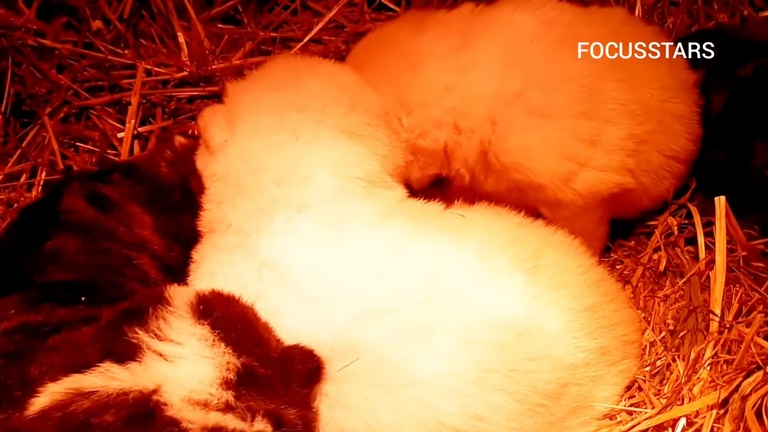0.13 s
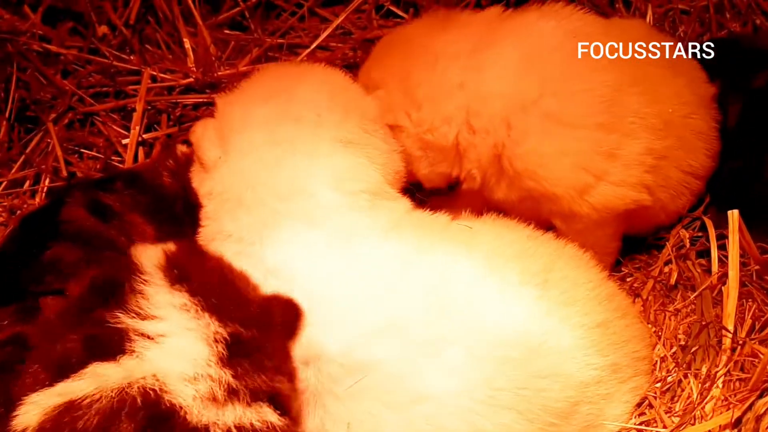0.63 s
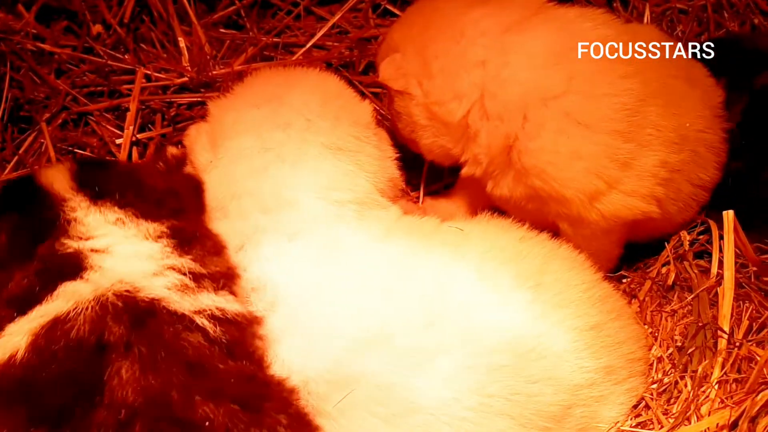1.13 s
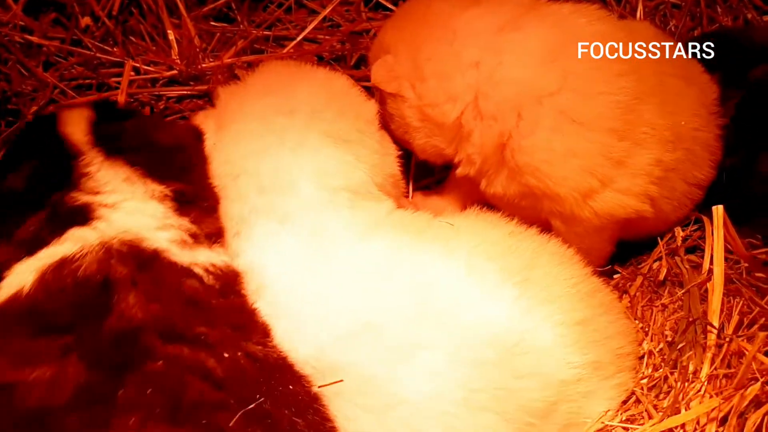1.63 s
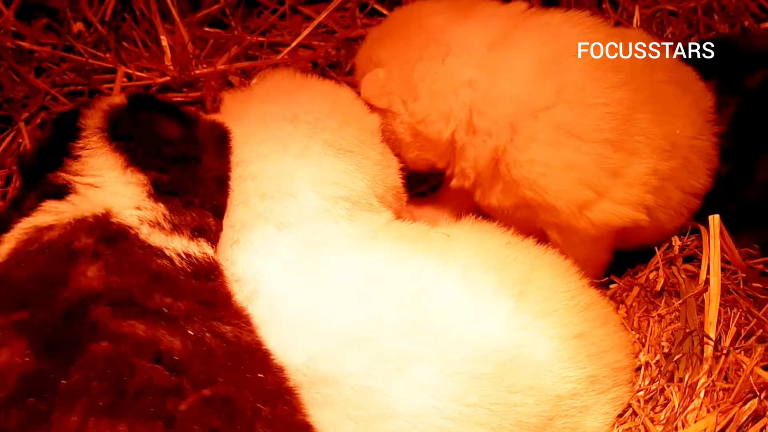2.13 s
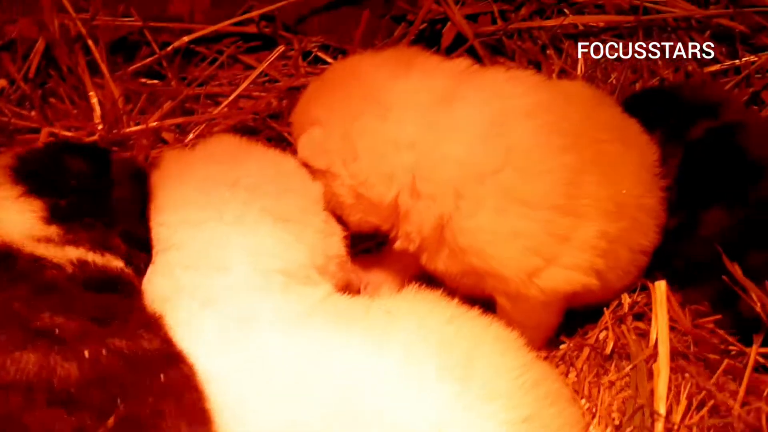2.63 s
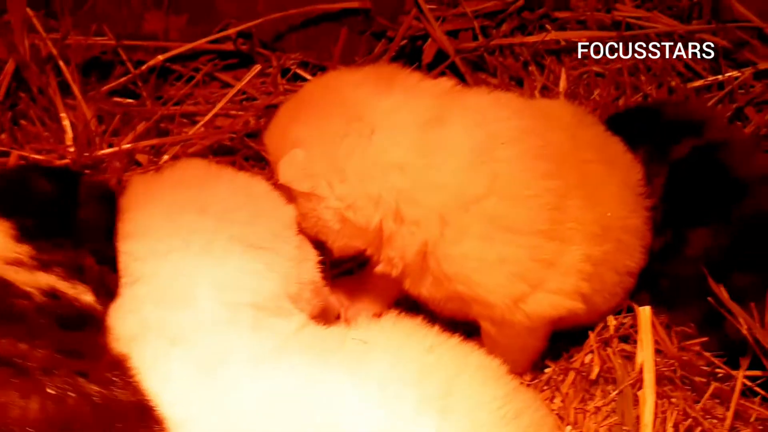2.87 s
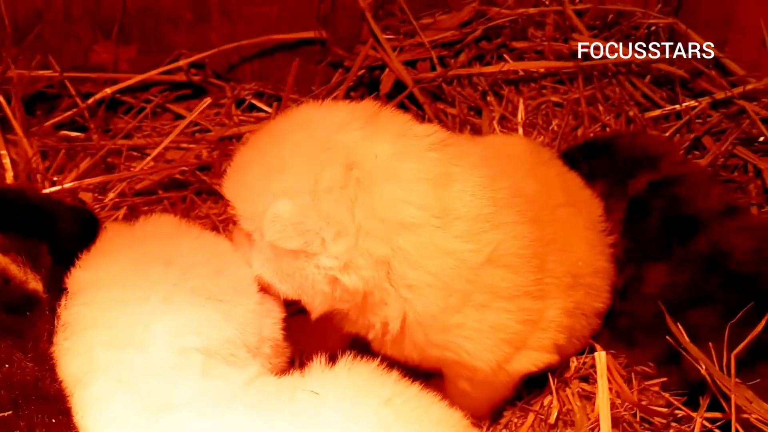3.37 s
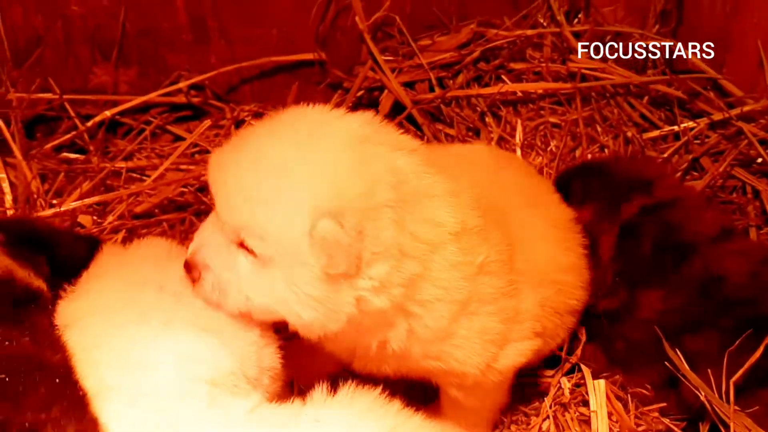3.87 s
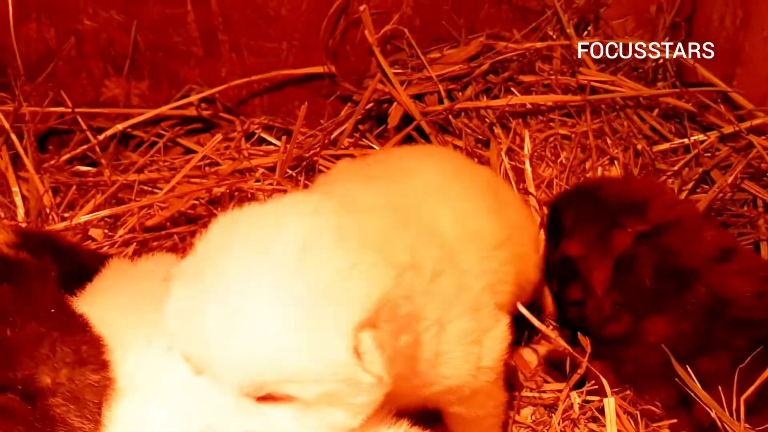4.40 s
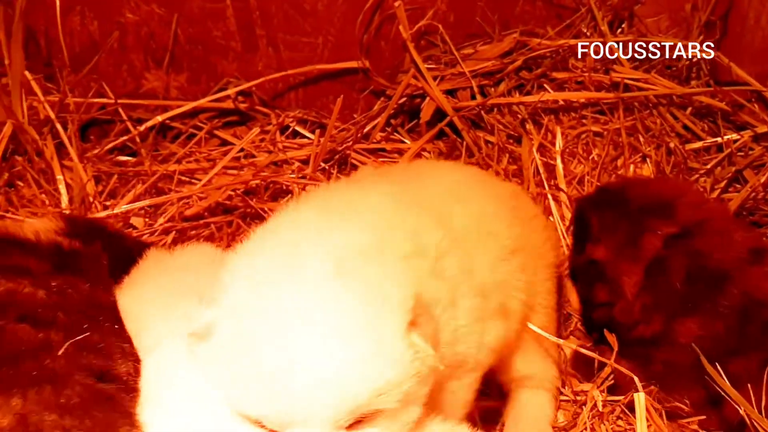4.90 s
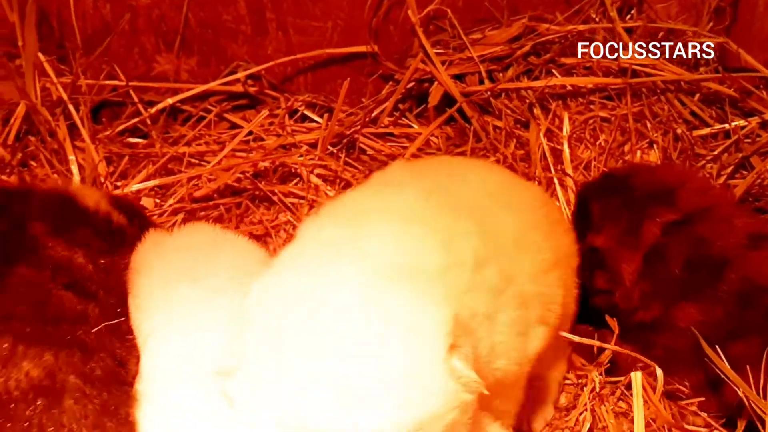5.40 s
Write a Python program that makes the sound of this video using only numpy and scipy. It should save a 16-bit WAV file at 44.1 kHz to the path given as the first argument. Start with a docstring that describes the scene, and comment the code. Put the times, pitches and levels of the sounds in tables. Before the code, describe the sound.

Dry straw rustles and snaps as young puppies softly grunt, groan and sniff, ending in a sharp crack and a close brushing rush.

```python
"""Newborn puppies in a straw nest

Puppies crawl over each other close to a small stereo microphone. Their grunts and one long rough
groan are vocal fold pulses through chest and throat resonances; noses snuffle in fluttering air noise.
Dry straw rustles as flickering hiss, stalks snap as ringing bursts, one thick stalk cracks.
At the end one pup pushes past in a rush of close noise, over low bumps and room tone."""
import sys
import numpy as np
from scipy import signal
from scipy.io import wavfile
from scipy.ndimage import uniform_filter1d

SR = 44100
rng = np.random.default_rng(int(sys.argv[2]) if len(sys.argv) > 2 else 0)


def volts_from_db(level):
    """Convert decibel levels to linear amplitude ratios."""
    exponent = np.asarray(level, float) / 20
    return 10 ** exponent


def store_wav(level_fs):
    """Save 16-bit WAV to argv[1]."""
    pcm = np.round(np.clip(np.atleast_2d(level_fs), -1, 1) * 32767)
    wavfile.write(sys.argv[1], SR, pcm.T.astype(np.int16))


N = 243049
TIME = np.arange(N) / SR


def evened(x):
    """Scales to rms 1."""
    return x / np.sqrt(np.mean(x ** 2) + 1e-20)


def read(points, hz):
    """Reads a spectrum on a log frequency axis."""
    f, value = np.transpose(points)
    return np.interp(np.log(hz + 1), np.log(f + 1), value)


def add(mix, s, sound, lean_db):
    """Places a sound between left and right; lean_db is left minus right."""
    part = mix[:, round(s * SR):][:, :len(sound)]
    part += volts_from_db(np.array([[lean_db / 2], [-lean_db / 2]])) * sound[:part.shape[1]]


def resonate(x, hz, width):
    """Shifts the curve hz down to zero, smooths, and shifts back: a resonance of gain 1."""
    turn = np.exp(2j * np.pi * np.cumsum(hz * np.ones(len(x))) / SR)
    r = np.exp(-np.pi * width / SR)
    return 2 * (turn * signal.lfilter([1 - r], [1, -r], x / turn)).real


def wander(count, hz):
    """Slow chance of rms 1, up to about hz."""
    noise = rng.standard_normal(count + 2000)
    return evened(signal.lfilter(*signal.butter(2, hz, fs=SR), noise)[2000:])


def stroke(start, length, db, change_db, edge, rise=None):
    """A gain that rises, drifts by change_db and falls softly."""
    t = TIME - start
    fade_in = t / max(rise or edge, .002)
    fade_out = (length - t) / max(edge, .002)
    gate = np.clip(np.minimum(fade_in, fade_out) + .5, 0, 1)
    return volts_from_db(db + change_db * np.clip(t / length, 0, 1)) * np.sin(np.pi / 2 * gate) ** 2


def hiss(colour, size, patchy_db, tilt=([0], [0])):
    """Two-channel noise from random short-time spectra with drifting patches; its mid has rms 1."""
    # likeness of left and right: hz, likeness (0-1)
    likeness = [(60, 0.67), (180, 0.65), (550, 0.35), (1650, 0.055), (4970, 0.021), (15000, 0.012)]
    # stereo lean: hz, left_minus_right_db
    side_lean = [(60, 0), (180, -5.5), (550, 2.5), (1650, -0.5), (4970, 1.5), (15000, 1.5)]
    frames, hz = 4 * N // size + 5, np.fft.rfftfreq(size, 1 / SR)[:, None]
    a, b, c, d, patches = rng.standard_normal((frames, len(hz), 5)).T
    patches = uniform_filter1d(patches, size // 64, 0)
    patches = evened(uniform_filter1d(patches, 4096 // size + 2, 1))
    same, lean = np.clip(read(likeness, hz), -1, 1), volts_from_db(read(side_lean, hz) / 2)
    left = a + 1j * b
    right = same * left + np.sqrt(1 - same ** 2) * (c + 1j * d)
    z = np.array([left * lean, right / lean])
    db = read(colour, hz) + patchy_db * patches
    # the tilt (dB per octave) pivots at 7 kHz and stops below 1 kHz
    tilt_now = np.interp(np.arange(frames) * size / 4 / SR, *tilt)
    db = db + tilt_now * np.log2(np.maximum(hz, 1000) / 7000)
    out = signal.istft(z * volts_from_db(db), nperseg=size, noverlap=3 * size // 4)[1][:, :N]
    return out / np.sqrt(np.mean(out.mean(0) ** 2))


def phrase(length, attack_s, db, start_hz, top_hz, mouth_db):
    """Effort climbs, holds and lets go; pitch arrives early, then sags; the mouth closes, then shuts."""
    tail_s, tail_db_per_s = .05, -250  # the folds ring out softly after the call
    attack_db, release_s, release_db = -15.5, 0.025, -11.5
    top_at_s, sag_per_s, sag_most = 0.0374, 0.702, .05  # sag as a share of the pitch
    shut_db, shut_tail_db_per_s = -2, -150
    t = np.arange(0, length + tail_s, 1 / SR)
    after = np.maximum(t - length, 0)
    climb_db = attack_db * np.clip(1 - t / attack_s, 0, 1)
    let_go_db = release_db * np.clip(1 + (t - length) / release_s, 0, 1)
    effort_db = db + climb_db + let_go_db + tail_db_per_s * after
    hz = np.interp(t, [0, top_at_s], [start_hz, top_hz])
    hz = hz * (1 - np.clip(sag_per_s * (t - top_at_s), 0, sag_most))
    return t, effort_db, hz, mouth_db + shut_db * (t / length - .5) + shut_tail_db_per_s * after


def grunt(call, rough, throb, throb_hz, chest_hz, width, small, nasal_db):
    """Vocal fold pulses, more uneven in spacing and strength when hoarse, through chest and throat."""
    # throat resonances, before the voice's own pitch factor: pitch_hz, width_hz, level_db
    throat_modes = [(534, 81, -0.5), (694, 57, 5.5), (824, 50, 7.5), (1024, 250, -1.5), (1370, 560, -6.5)]
    # upper ring, before the voice's pitch factor and nasal level: pitch_hz, width_hz, level_db
    nasal_modes = [(1685, 260, -7.5), (1900, 83, -5.5), (2160, 220, -10.5)]
    # calls open bright, long ones darken
    flare_db_per_octave, flare_s, darken_db_per_octave_s = 6.0, .1, -10.0
    t, effort_db, hz, mouth_db = phrase(*call)
    turns = np.cumsum(hz * np.exp(.18 * rough * wander(len(t), 45))) / SR
    folds = sum(np.cos(2 * np.pi * k * turns) for k in range(1, 18))
    puffs = (0.86 + np.exp(-(turns % 1) / 0.19)) * rng.standard_normal(len(t))
    # a slower flap in the throat puts side lines next to each partial
    flap_hz = throb_hz * np.exp(0.17 * wander(len(t), 6))
    flap = np.cos(2 * np.pi * np.cumsum(flap_hz) / SR)
    folds *= 1 - 0.8 * throb + throb * flap
    uneven = volts_from_db(2.2 * rough * wander(len(t), 50))
    drive = uneven * ((1 - rough) * evened(folds) + rough * evened(puffs))
    chest = drive
    for _ in range(3):  # three passes for steep flanks
        chest = resonate(chest, chest_hz, width)
    modes = throat_modes + [(f, w, db + nasal_db) for f, w, db in nasal_modes]
    bright_db = flare_db_per_octave * np.exp(-t / flare_s) + darken_db_per_octave_s * t
    throat = 0
    for k, (f, w, db) in enumerate(modes):
        gain = volts_from_db(db + bright_db * np.log2(max(f, 810) / 810))
        throat = throat + (-1) ** k * gain * resonate(drive, f * small, w)
    throat = signal.sosfilt(signal.butter(3, 450, "high", fs=SR, output="sos"), throat)
    soft = np.clip(np.minimum(t, t[-1] - t) / 0.003, 0, 1)
    return volts_from_db(effort_db) * (evened(chest) + volts_from_db(mouth_db) * evened(throat)) * soft


def snuffle(start, length, flow_db, change_db, rasp_db, hz):
    """Fluttering air noise through the nose, with a low rasp."""
    # nose resonances: factor on the nose pitch, width_hz of the first of two passes, level_db
    nose_modes = [(0.984, 166, 3.5), (0.636, 105, -6.5)]
    edge_s, gusts_db, nose_sag = 0.07, -0.5, 0.036  # sag: share the pitch sinks over a breath
    air = volts_from_db(0.97 * wander(N, 21.5)) * rng.standard_normal((2, N))
    hz = hz * (1 + nose_sag * (.5 - np.clip((TIME - start) / length, 0, 1)))
    nose = sum(volts_from_db(db) * resonate(resonate(air[0], k * hz, w), k * hz, 2 * w) for k, w, db in nose_modes)
    rasp = resonate(resonate(air[1], 266, 134), 190, 260)
    flow = stroke(start, length, flow_db, change_db, edge_s) * volts_from_db(gusts_db * wander(N, 23))
    return flow * (evened(nose) + volts_from_db(rasp_db) * evened(rasp))


def squeak():
    """A thin fuzzy whistle at one grunt: air through a narrow nostril."""
    # one whistle: start_s, length_s, level_db, change_db, pitch_hz, width_hz
    whistle = (3.89, .15, -63, -5, 1570, 45)
    *course, hz, width = whistle
    return stroke(*course, .02) * evened(resonate(rng.standard_normal(N), hz, width))


def puppies():
    """All grunts, the groan, the snuffling and the whistle, as pressure waves at left and right."""
    # calls, the long groan last: start_s, length_s, attack_s, effort_db, start_pitch_hz,
    # pitch_reached_hz, mouth_db (throat against chest)
    calls = [(0.896, 0.065, 0.025, -53, 157.2, 186.7, 7), (1.124, 0.052, .012, -56, 190.5, 190.7, -4.5),
             (1.617, 0.091, 0.037, -46.5, 140.5, 155.7, 2.5), (3.867, .085, 0.027, -44, 135.2, 133.8, -4.5),
             (4.47, 0.066, 0.027, -47, 130.8, 134.6, -4), (5.128, 0.048, 0.02, -50, 173.2, 178, -16),
             (2.535, 0.66, 0.027, -45.5, 208.4, 210.4, -8)]
    # hoarseness of each call: roughness (0-1), throb depth (0-1), throb_hz
    hoarseness = [(.3, 0, 0), (.55, 0, 0), (.33, 0, 0), (.5, .35, 66), (.55, .35, 66), (.4, 0, 0),
                  (.68, 1, 23)]
    # body of each caller: left_minus_right_db, chest_hz, chest width_hz of each of three passes,
    # factor on the throat pitches, nasal_db
    bodies = [(5, 255, 110, 0.923, 2), (4.5, 250, 117, 0.896, 4.5), (4, 267, 166, 0.875, 1.5),
              (-0.3, 210, 192, 0.943, 2.5), (2.5, 206, 140, 0.9, 1), (-2, 223, 88, 0.85, 1),
              (0, 212, 148, 1.034, -6)]
    # breaths: start_s, length_s, flow_db, change_db until the end, rasp_db above the flow, nose_hz
    breaths = [(0.014, 0.33, -60, -6.5, -9, 880), (1.4, 0.2, -61.5, -1, -10.5, 834),
               (1.948, 0.39, -68.5, -0.5, -4, 903), (3.797, 0.14, -72.5, 12, 6, 830),
               (3.94, .11, -59, -9, -3, 840), (4.075, 0.13, -75.5, -7.5, 15, 845),
               (4.534, 0.144, -66.5, -1, 3.5, 830), (4.708, 0.19, -67, -2.5, 5.5, 810),
               (4.917, 0.15, -62, 5, -1.5, 796)]
    pups = np.zeros((2, N))
    for (s, *call), hoarse, (side_db, *body) in zip(calls, hoarseness, bodies):
        add(pups, s, grunt(call, *hoarse, *body), side_db)
    add(pups, 0, sum(snuffle(*row) for row in breaths) + squeak(), 2.0)
    pups[1] = np.roll(pups[1], 11)  # samples: they lie a little nearer the left
    return pups


def rustle():
    """Countless tiny stalk slips: hiss that flickers, pricked by short random crackles."""
    # shoves of a body through the straw: start_s, length_s, level_db, change_db until the end
    shoves = [(0, 0.073, -38, -11.5), (0.067, 0.1, -45.5, -1), (0.185, 0.083, -49.5, -2.5),
              (0.285, 0.079, -48.5, -3.5), (.39, 0.54, -48, -0.5), (0.671, 0.091, -39.5, -6),
              (.76, 0.25, -45.5, -2.5), (0.997, 0.16, -46.5, -3.5), (1.174, .18, -46, 0.5),
              (1.35, 0.12, -45.5, 7.5), (1.44, .18, -40.5, -5), (1.612, 0.17, -39, -14),
              (1.784, 0.11, -47, -3.5), (1.905, 0.069, -52.5, -5), (1.98, 0.12, -52.5, -1),
              (2.1, .14, -48, -3), (2.247, .26, -53.5, -2.5), (2.562, 0.2, -55, -2.5),
              (2.86, 0.13, -54.5, 4), (3.013, 0.18, -53, -4.5), (3.225, 0.056, -55, -0.5),
              (3.343, 0.031, -59, -2), (3.404, 0.029, -56, -3), (3.535, .03, -58, 0),
              (3.594, 0.045, -47.5, -13), (3.695, .125, -46, -3), (3.818, .14, -54, -4.5),
              (3.991, 0.059, -63, 7.5), (4.12, 0.032, -69, 0), (4.26, 0.18, -63, 9.5),
              (4.522, 0.15, -60, 6.5), (4.786, 0.19, -59, -0.5), (5.155, 0.176, -54.5, 13.5),
              (5.329, .2, -39.5, -16)]
    # straw colour: hz, relative level_db per Hz
    straw_colour = [(590, -33.5), (1000, -29.5), (1120, -38), (1620, -22.5), (1880, -21.5), (2160, -18),
                    (3490, -8.5), (3780, -4.5), (5210, -6), (6340, 0.5), (8440, -6), (10600, -1.5),
                    (12800, -1.5), (15500, 2)]
    # where it rubs: time_s, left_minus_right_db, tilt_db per octave
    places = [(0.0, 0, -4.5), (1.0, 1.5, -4), (1.9, 1, -3.5), (2.9, 0.5, -3), (3.6, 0, -2),
              (4.2, -0.5, -3.5), (4.8, 0.5, -2), (5.51, -1.5, -4)]
    edge_s, rise_s = 0.037, .012
    settle_db, stir_db = -66.5, 4.0  # between shoves the straw settles
    power = sum(stroke(*row, edge_s, rise_s) ** 2 for row in shoves)
    level = np.sqrt(power + volts_from_db(settle_db + stir_db * wander(N, 35)) ** 2)
    s, side_db, tilt_db = np.transpose(places)
    # about 150 crackles a second, each dying away over 2.6 ms
    crackle = (rng.random(N) < 150 / SR) * volts_from_db(2.6 * np.minimum(rng.exponential(1, N), 3))
    bursts = signal.lfilter([1], [1, -np.exp(-1 / (0.0026 * SR))], crackle)
    shake = volts_from_db(1.03 * wander(N, 28)) * (1 + 0.25 * bursts)
    side = volts_from_db(np.outer([.5, -.5], np.interp(TIME, s, side_db)))
    return level * side * evened(shake) * hiss(straw_colour, size=256, patchy_db=1.5, tilt=(s, tilt_db))


def snap(db, hz, t60, grit):
    """A burst of noise, part broad and part ringing at the stalk's pitch; thin stalks have no low end."""
    t = np.arange(len(grit)) / SR
    burst = grit * volts_from_db(-60 * t / max(t60, .002)) * np.minimum(t / 0.0017, 1) ** 2
    broad = signal.sosfilt(signal.butter(4, 0.52 * hz, "high", fs=SR, output="sos"), burst)
    pitched = resonate(resonate(burst, hz, 0.048 * hz), hz, 1.8 * hz)
    ring = 1.17 * evened(broad) + evened(pitched)
    return volts_from_db(db) * ring / abs(ring).max()


def crack(db):
    """One sharp break rings all the modes of a thick stalk, with a spray of splinter noise."""
    # what the stalk rings with: pitch_hz, relative level_db, t60_s
    stalk_modes = [(1610, -43, 0.0093), (2250, 1.5, 0.0096), (4620, -1, 0.0053), (6230, 2, 0.0047),
                   (8100, 4, 0.0022), (11100, 6, 0.0027), (13500, 11, 0.0026)]
    t = np.arange(3000) / SR
    ring = sum(volts_from_db(level - 60 * t / t60) * np.sin(2 * np.pi * hz * t) for hz, level, t60 in stalk_modes)
    splinters = resonate(rng.standard_normal(len(t)), 3400, 3800) * volts_from_db(-19 - 60 * t / 0.04)
    thin = signal.butter(3, 950, "high", fs=SR, output="sos")  # too small to move low air
    return volts_from_db(db) * signal.sosfilt(thin, ring / abs(ring).max() + splinters)


def breaking_stalks():
    """Single stalks slip or break, each at its own place; the thickest cracks."""
    # snaps: start_s, peak_db before panning, pitch_hz, left_minus_right_db
    snaps = [(0.077, -34.5, 11000, 3.0), (0.11, -31.5, 15000, 7), (0.147, -31, 7150, 3),
             (0.2004, -36, 10800, -7), (0.6875, -33, 7040, 16), (0.7028, -30, 7050, 1.5),
             (0.7256, -29, 13900, 11), (0.981, -38, 6750, 11), (1.1802, -37, 7140, -7),
             (1.3646, -30, 13900, 9), (1.6252, -34, 3560, -1), (2.005, -42.5, 6500, 19),
             (2.049, -39, 6740, 16), (2.091, -32, 6840, 8), (2.105, -27, 6930, 20.5),
             (2.1077, -28, 6900, -9), (2.155, -37, 7100, 16), (2.3665, -38, 6750, 12),
             (3.694, -29, 7000, 3), (3.72, -38, 6960, 1.0), (3.7498, -33, 14900, -4),
             (3.761, -37, 6700, 1.0), (3.809, -38, 4080, -7), (4.8504, -33, 14800, -3),
             (5.2085, -39, 7100, 11)]
    # the thickest stalk: start_s, level_db before its low cut
    thickest = (5.0033, -11.5)
    stalks = np.zeros((2, N))
    for (s, db, hz, side_db), grit in zip(snaps, rng.standard_normal((len(snaps), 2000))):
        add(stalks, s, snap(db, hz, 0.019, grit), side_db)
    s, db = thickest
    add(stalks, s, crack(db), -1.5)
    return stalks


def rush():
    """A puppy pushing past close by: broad noise with a few fuzzy whistles."""
    # swell of the noise, before a lift of 1 dB: time_s, level_db
    swell = [(5.14, -80), (5.234, -60), (5.3, -51.5), (5.476, -44.5), (5.51, -44)]
    # colour of air and fur: hz, relative level_db per Hz
    fur_colour = [(150, -55), (250, -13), (358, -17), (678, -6.5), (734, -25), (816, -2), (1150, -17.5),
                  (1740, -5.5), (1940, -7), (2810, -7.5), (4030, -7.5), (4420, -7.5), (6000, -12),
                  (7800, -15), (13200, -120)]
    # narrow whistles, around which their levels wander: pitch_hz, width_hz, level_db
    whistles = [(1950, 36, -9.5), (4040, 75, -5), (2210, 210, -6.5)]
    s, level_db = np.transpose(swell)
    wide = hiss(fur_colour, size=512, patchy_db=0.6)
    air = rng.standard_normal(N)
    narrow = sum(volts_from_db(db + 3.2 * wander(N, 7.6)) * evened(resonate(air, f, w)) for f, w, db in whistles)
    side = volts_from_db(np.array([[-1.5], [1.5]]))  # the whistles lean right
    return volts_from_db(1.0 + np.interp(TIME, s, level_db, left=-120)) * (wide + side * narrow)


def nest(x):
    """Short reflections from the shed walls, other ones in each ear but alike in the bass."""
    t = np.arange(9000) / SR
    taps = rng.standard_normal((2, len(t))) * volts_from_db(-60 * t / 0.16) * (t > .002)
    low = signal.sosfiltfilt(signal.butter(2, 240, fs=SR, output="sos"), taps)
    taps += low[0] - low
    return signal.oaconvolve(x, taps / np.linalg.norm(taps[0]), axes=1)[:, :N]


def rumble():
    """Low bumps of the nest floor and the hand-held microphone: swells of deep noise over a faint bed."""
    # bumps: start_s, length_s, level_db
    bumps = [(0, 0.29, -71), (.335, 0.12, -55), (0.437, 0.19, -61.5), (0.682, .11, -57),
             (0.828, 0.35, -80.5), (1.218, 0.073, -54.5), (1.423, 0.15, -59.5), (1.625, .12, -51),
             (2.316, 0.071, -60), (2.618, .05, -66), (2.82, 0.056, -58), (3.12, 0.15, -61),
             (4.27, 0.07, -77), (5.05, 0.087, -64), (5.3, .08, -62.5)]
    # rumble colour: hz, relative level_db per Hz
    deep_colour = [(20, -32), (40, -33), (70, 2.5), (95, 0), (140, -6), (190, -18), (350, -23)]
    bed_db, edge_s, fade_db = -77, .04, -14.5
    level = volts_from_db(bed_db) + sum(stroke(*row, fade_db, edge_s) for row in bumps)
    return level * hiss(deep_colour, size=2048, patchy_db=2.0)


def room_tone():
    """Steady background air: a quiet coloured noise with slow patches."""
    # room colour: hz, relative level_db per Hz
    room_colour = [(12, -51), (20, -51), (92, 4.5), (274, -8.5), (439, -12.5), (811, -13), (1450, -13.5),
                   (3170, -11.5), (4430, -1.5), (5380, -7.5), (6720, -3), (8400, -14.5), (10800, -7.5),
                   (15500, -7)]
    return volts_from_db(-57.5) * hiss(room_colour, size=1024, patchy_db=3.0)


def scene():
    """Puppies and snaps with their reflections over straw, rush, rumble and room tone."""
    pups = puppies()
    stalks = breaking_stalks()
    echoes = nest(volts_from_db(-8) * pups + volts_from_db(-11) * stalks)
    return pups + stalks + echoes + rustle() + rush() + rumble() + room_tone()


def top_cut(x):
    """Nothing passes above the cut-off."""
    return signal.sosfilt(signal.butter(12, 17000, fs=SR, output="sos"), x)


def record(dry):
    """Limits the band with a steep low-pass and finishes the mix."""
    edge_hz = 15740
    low_pass = signal.firwin(801, edge_hz, window=("kaiser", 4), fs=SR)
    narrow = signal.oaconvolve(dry, low_pass[None], "same")
    return top_cut(narrow)


dry = scene()
out = record(dry)
store_wav(out)
```